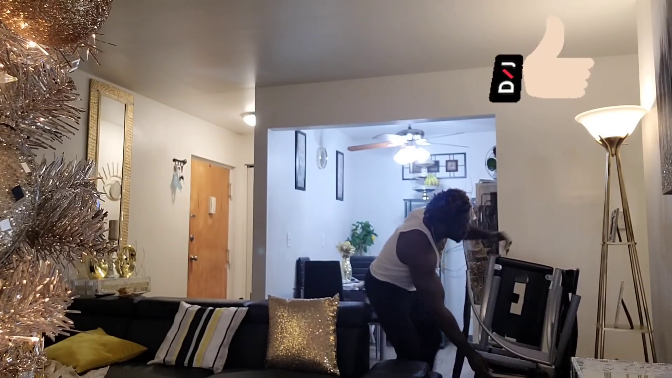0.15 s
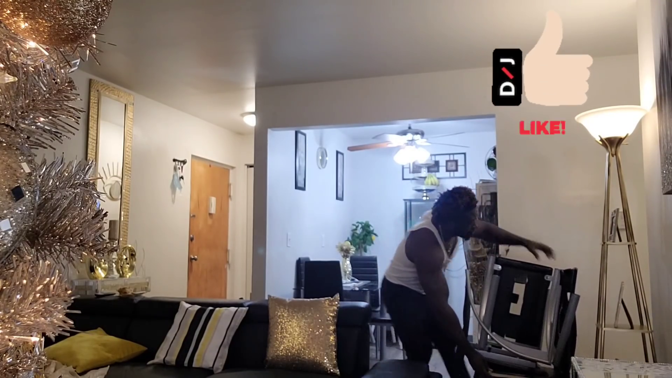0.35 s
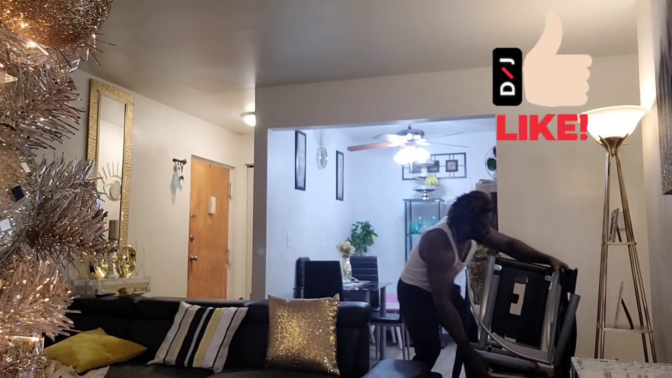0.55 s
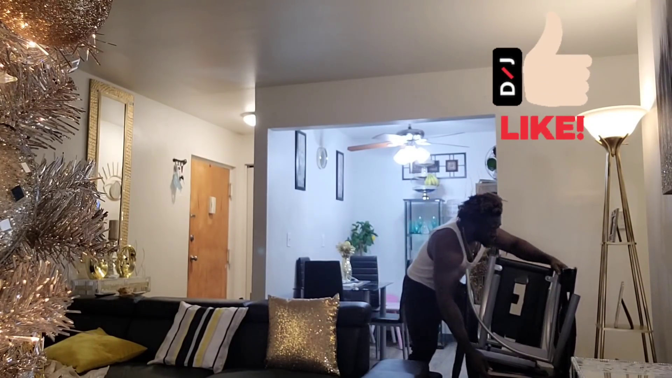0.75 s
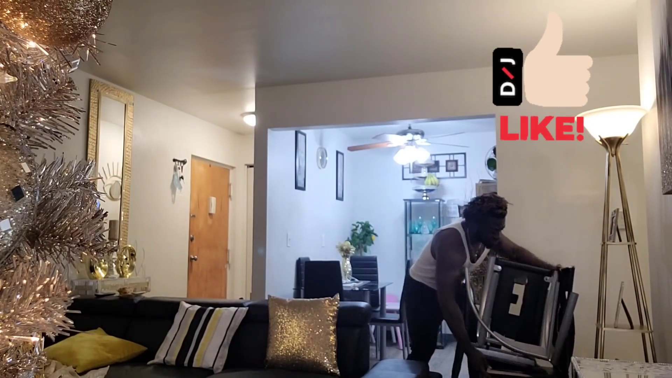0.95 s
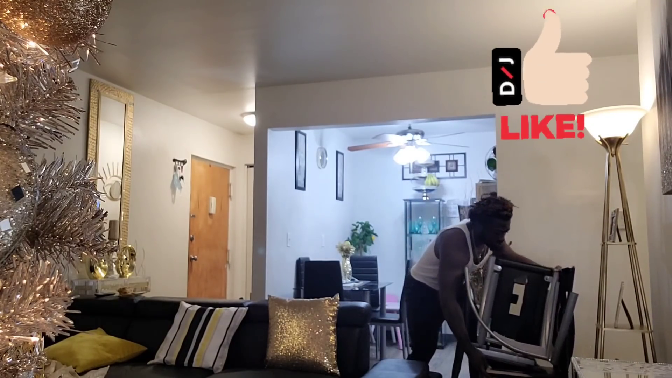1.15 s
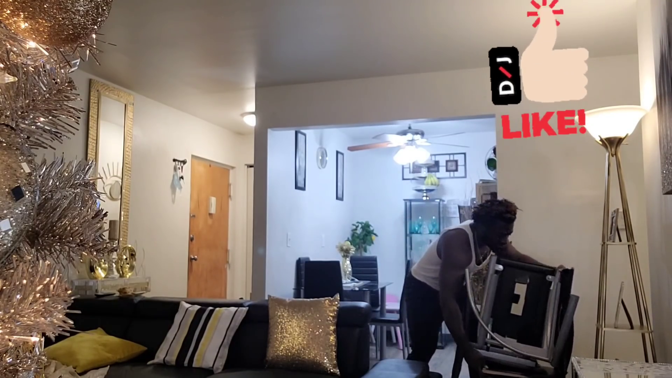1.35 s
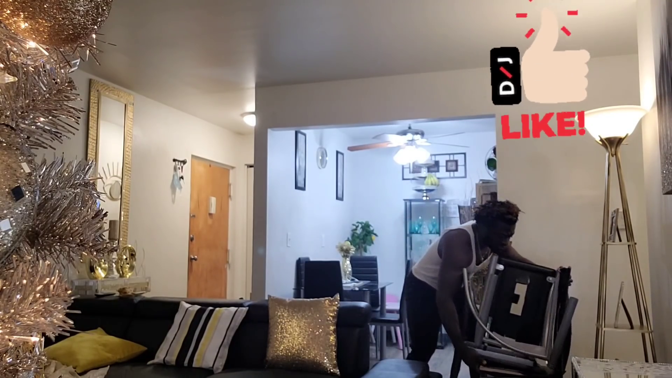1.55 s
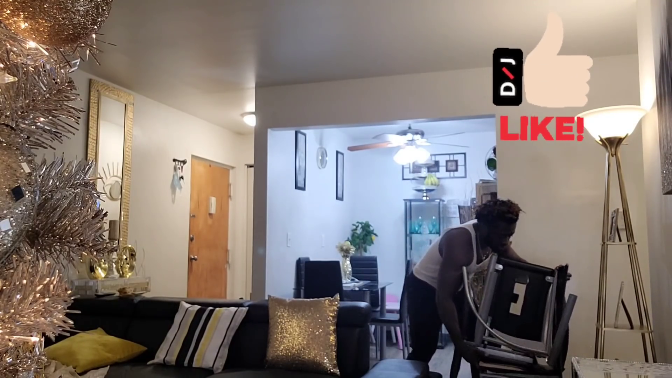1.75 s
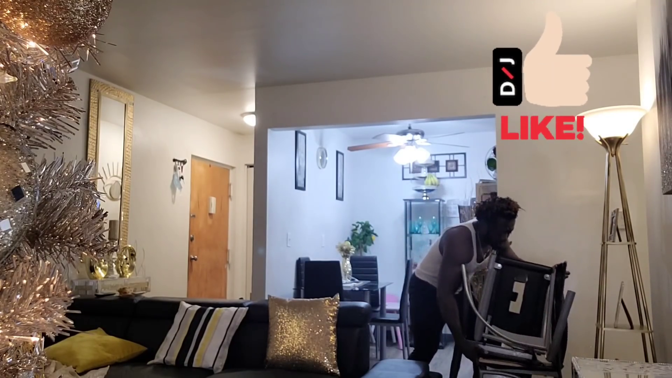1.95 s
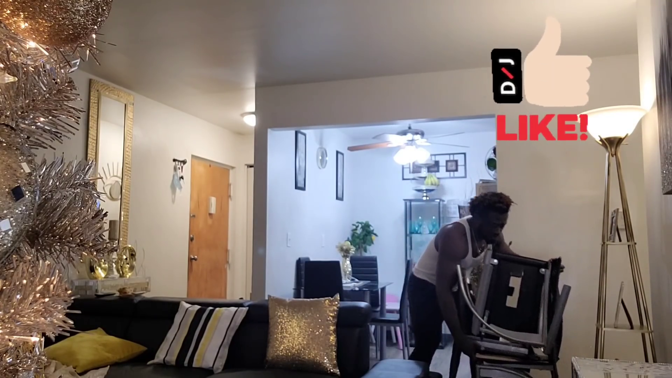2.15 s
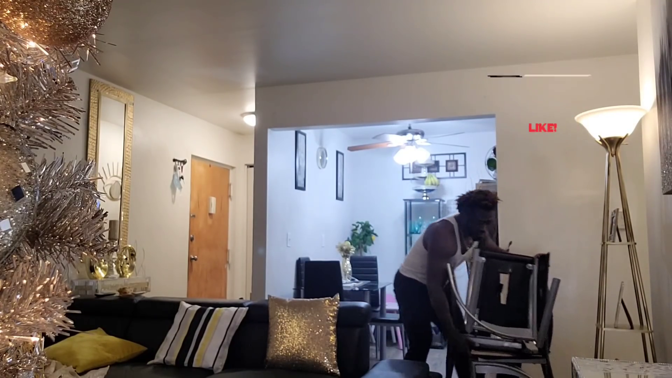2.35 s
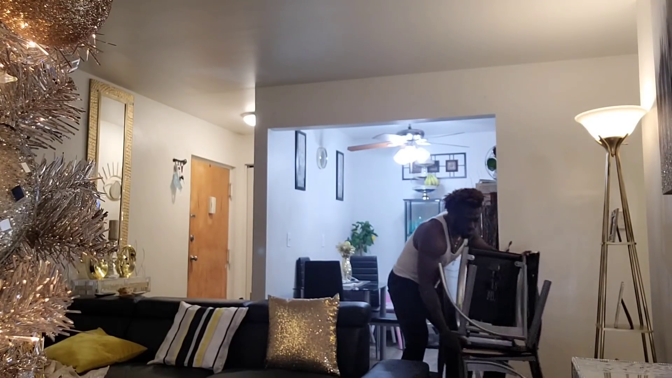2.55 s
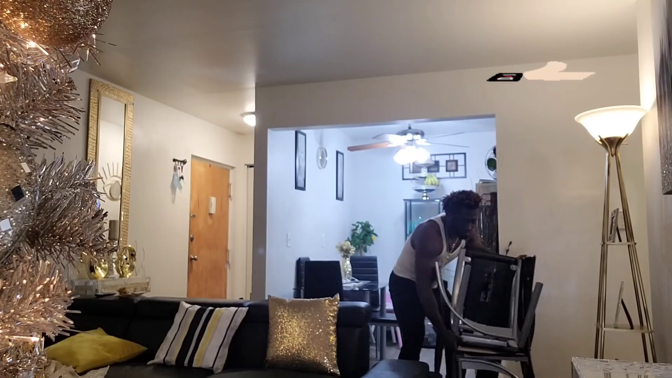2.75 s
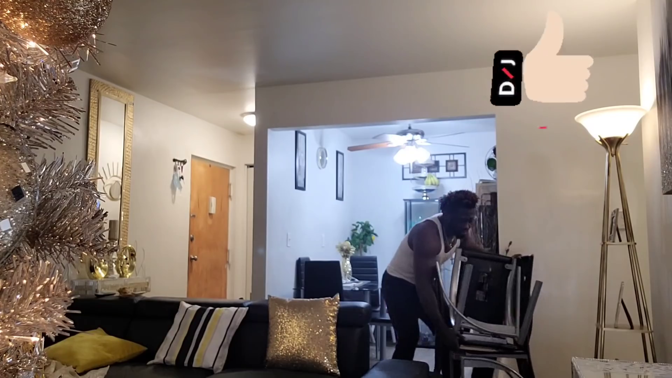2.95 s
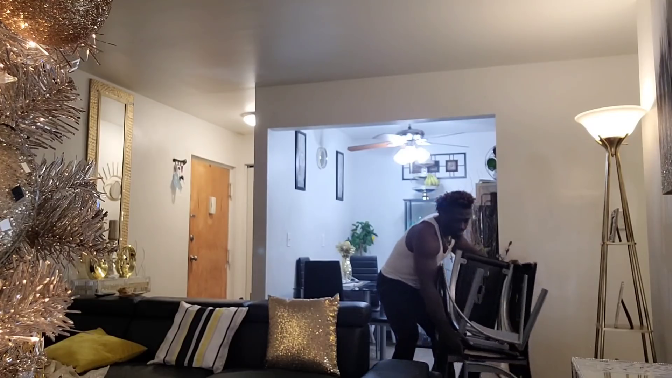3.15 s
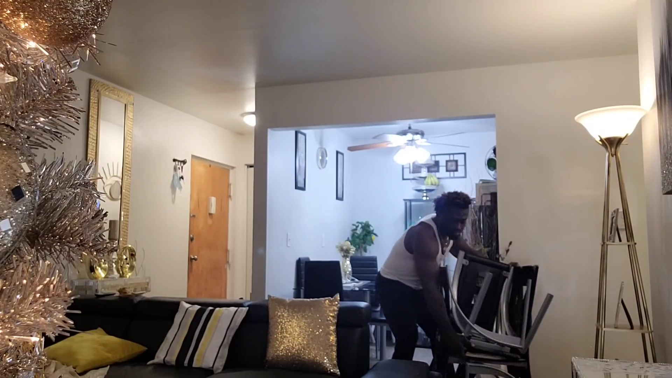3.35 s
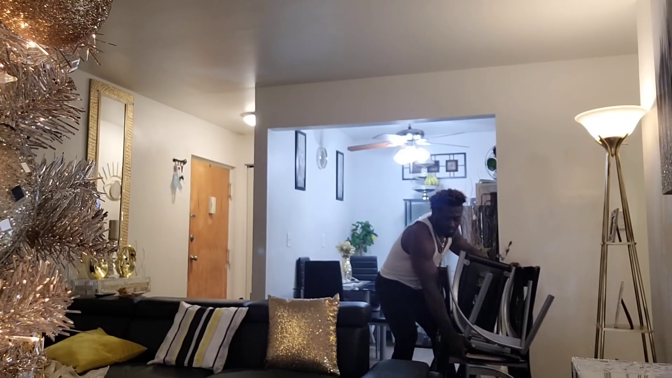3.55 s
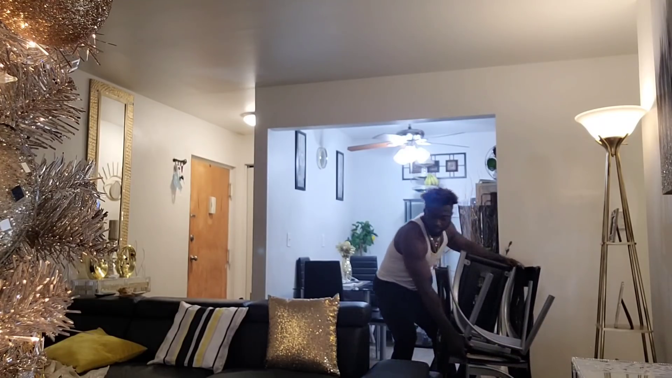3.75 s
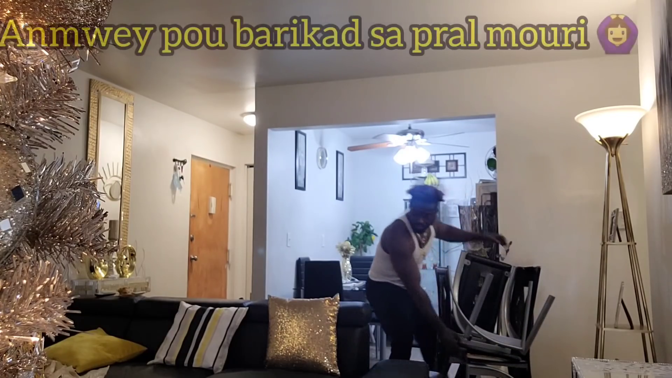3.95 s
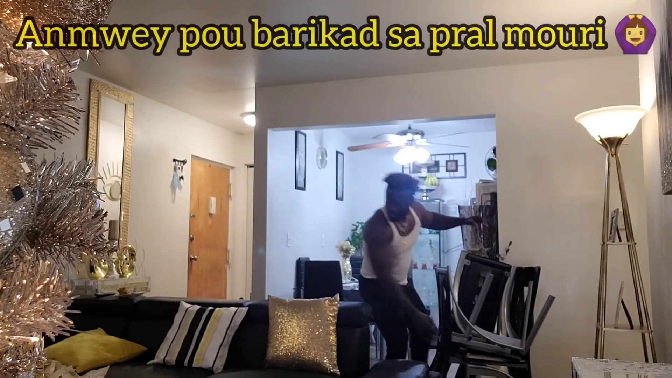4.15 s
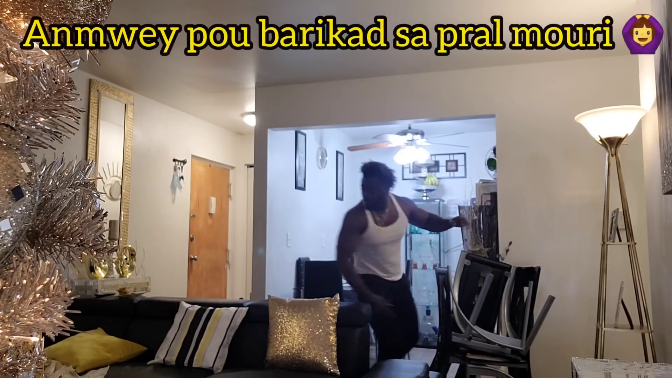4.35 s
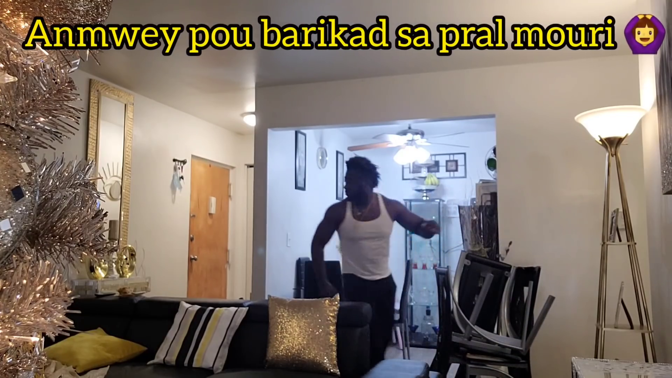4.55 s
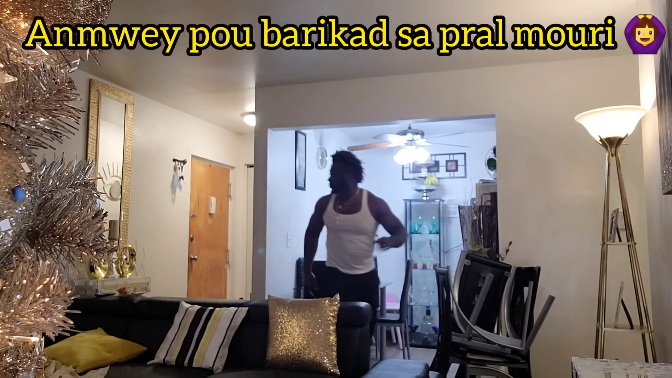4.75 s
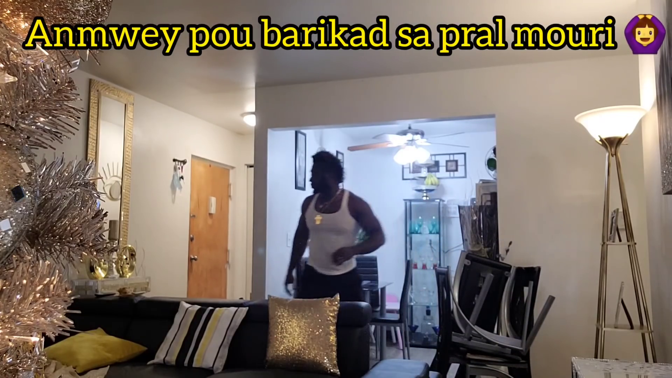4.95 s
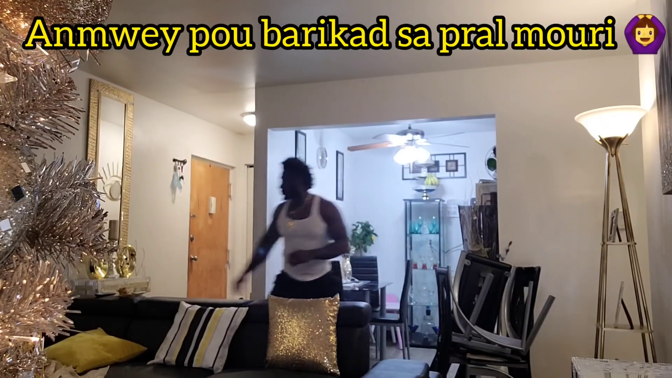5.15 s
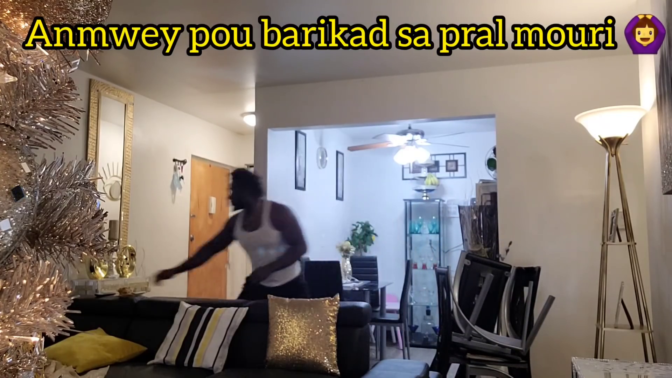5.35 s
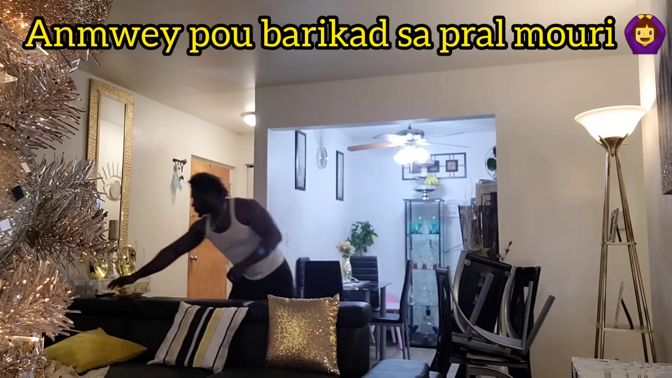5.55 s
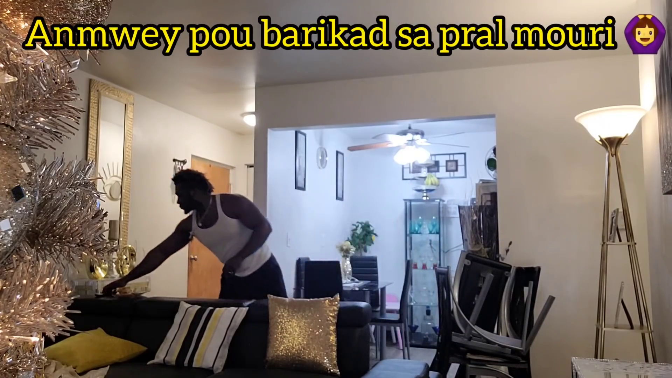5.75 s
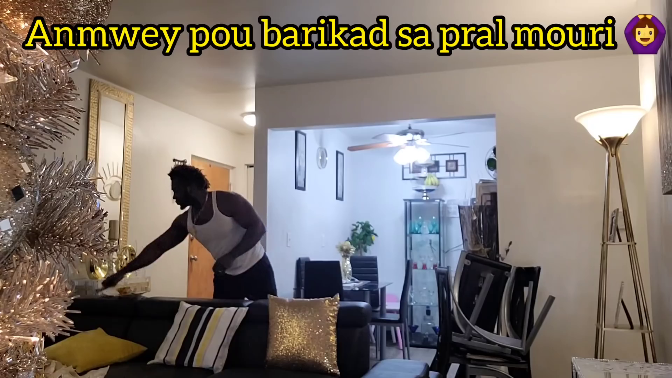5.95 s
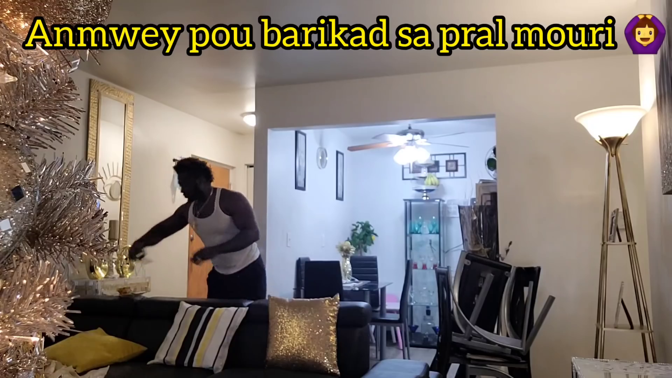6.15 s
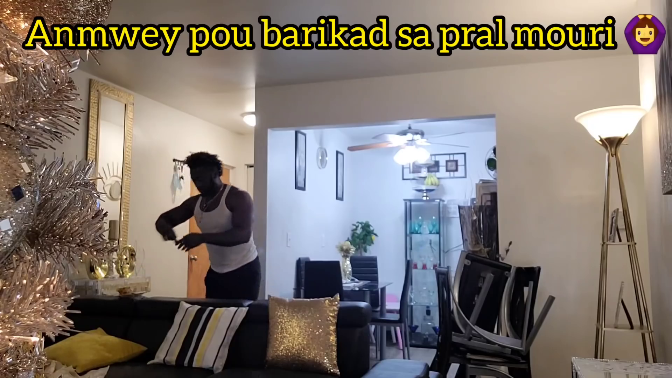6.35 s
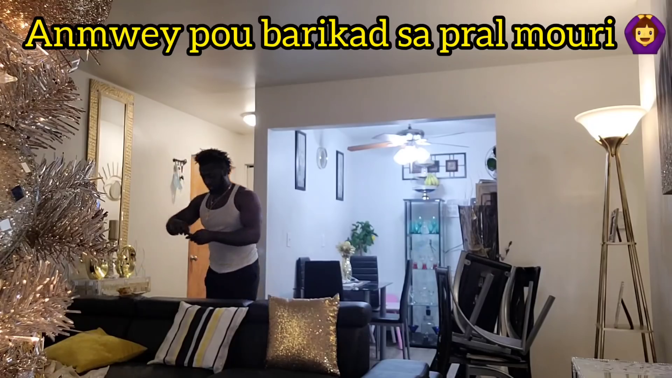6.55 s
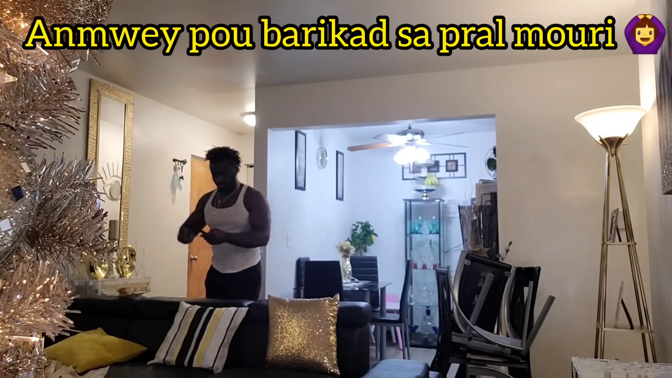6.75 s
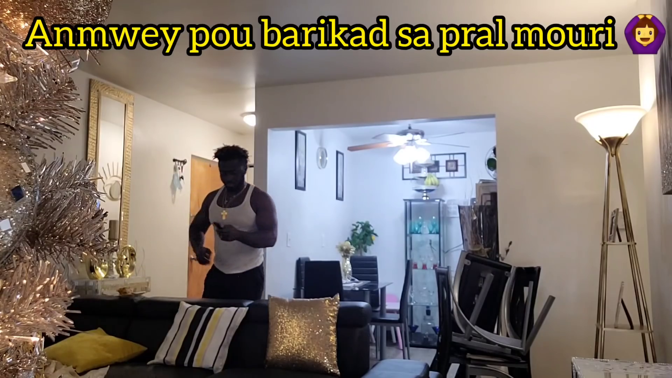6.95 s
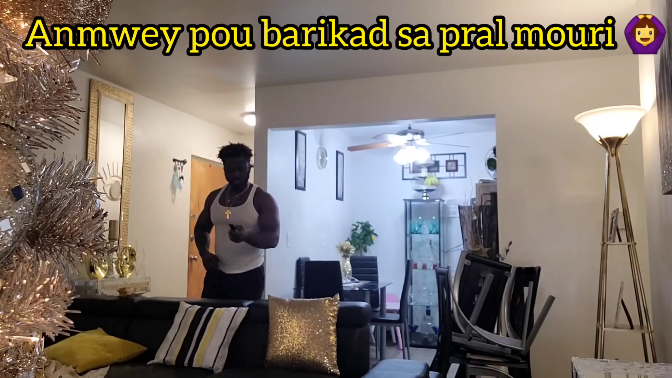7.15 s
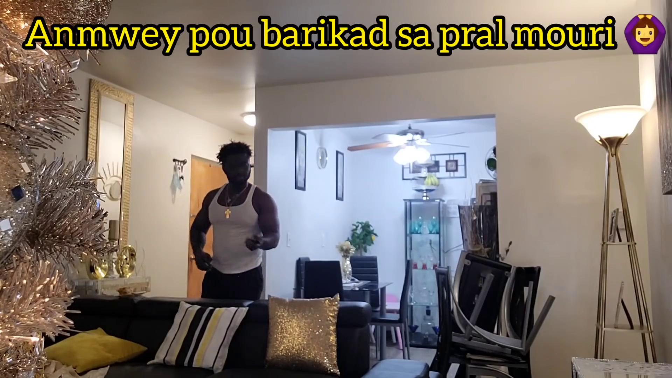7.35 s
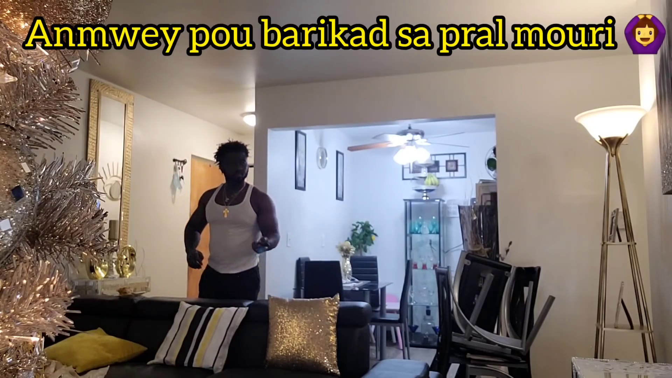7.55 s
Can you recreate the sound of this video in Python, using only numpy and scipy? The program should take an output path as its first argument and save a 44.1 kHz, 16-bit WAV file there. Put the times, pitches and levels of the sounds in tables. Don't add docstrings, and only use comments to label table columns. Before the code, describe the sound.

In a furnished living room, chairs are moved several metres from a stereo microphone. Small thuds, scuffs and thin metallic jingles come first, then loud clattering as the frames collide, then a softer knock and scrape as they settle. Slippered steps and light cloth rustle follow. A low appliance hum and faint once-a-second clock tick continue underneath.

```python
import sys
import numpy as np
from scipy import signal
from scipy.fft import rfft, irfft
from scipy.io import wavfile
from scipy.ndimage import uniform_filter1d

SR = 44100
rng = np.random.default_rng(int(sys.argv[2]) if len(sys.argv) > 2 else 0)


def log_audio(samples):
    frames = np.atleast_2d(samples).T
    limited = np.clip(frames, -1, 1)
    pcm = np.round(limited * 32767).astype(np.int16)
    wavfile.write(sys.argv[1], SR, pcm)


def invert_db(level):
    return 10 ** (np.asarray(level, dtype=float) / 20)


N = 335547


def rms_one(x):
    return x / np.sqrt(np.mean(x ** 2) + 1e-20)


def at_hz(points, hz):
    table_hz, values = np.transpose(points)
    return np.interp(np.log(hz), np.log(table_hz), values)


def drift(rate_hz):
    r = np.exp(-80 * np.pi * rate_hz / SR)
    noise = rng.standard_normal(N // 40 + 2002)
    slow = rms_one(signal.lfilter([1], [1, -2 * r, r * r], noise)[2000:])
    return np.interp(np.arange(N) / 40, np.arange(len(slow)), slow)


def ring(clicks, hz, t60_s):
    r, w = invert_db(-60 / (t60_s * SR)), 2 * np.pi * hz / SR
    return signal.lfilter([0, np.sin(w)], [1, -2 * r * np.cos(w), r * r], clicks + 1e-18)


def rattle(starts_s, length_s, count):
    place = rng.random((len(starts_s), count)) - 0.15
    place[:, 0] = 0
    times = np.asarray(starts_s)[:, None] + length_s * 2 * place
    weaker_db = np.where(place >= 0, -14 * place, 50 * place - 4)
    return times.ravel(), weaker_db.ravel()[:, None]


def strike(times, levels_db, modes, uneven_db, size=N):
    at = np.clip((np.asarray(times) * SR).astype(int), 0, size - 1)
    luck = rng.standard_normal((len(at), len(modes), 2))
    sizes = invert_db(levels_db + uneven_db * luck[..., 0]) * np.sign(luck[..., 1])
    out = np.zeros(size)
    for k, (hz, db, t60_s) in enumerate(modes):
        out += ring(np.bincount(at, sizes[:, k], size) * invert_db(db), hz, t60_s)
    return out


# (frequency [Hz], left-right correlation)
LIKENESS = [(60, 0.93), (130, 0.95), (190, 0.93), (270, 0.73), (500, 0.51), (1000, 0.044), (16000, 0.093)]
# (frequency [Hz], left minus right [dB])
LEAN = [(60, -5.5), (180, 3), (550, -7.5), (1650, -3), (4970, -3), (15000, -0.5)]


def bands(size):
    edges_hz = 25 * 2 ** np.arange(0, 9.6, 1 / 3)
    opposite = np.array([[1], [-1]])
    white = rng.standard_normal((2, 2, size))
    for k, (low, high) in enumerate(zip(edges_hz, edges_hz[1:])):
        band_pass = signal.butter(2, [low, high], "band", fs=SR, output="sos")
        mid, side = signal.sosfilt(band_pass, white[k % 2])
        hz = np.sqrt(low * high)
        alike = np.clip(at_hz(LIKENESS, hz), -1, 1)
        both = np.sqrt(1 + alike) * mid + np.sqrt(1 - alike) * side * opposite
        yield hz, both * invert_db(at_hz(LEAN, hz) / 2 * opposite)


# (frequency [Hz], t60 [s])
ROOM_T60 = [(100, 0.38), (300, 0.21), (1000, 0.35), (4000, 0.32), (12000, 0.26)]


def room(x, wet_db):
    evenness = 0.85
    t = np.arange(SR // 2) / SR
    early = (1 + invert_db(11.5 - 60 * t / 0.023)) * (1 - np.exp(-t / 0.0019))
    echoes = 0
    for hz, band in bands(len(t)):
        fade = early * invert_db(-60 * t / at_hz(ROOM_T60, hz))
        band_power = np.mean((band.mean(axis=0) * fade) ** 2)
        echoes = echoes + band * fade * np.sqrt(hz * np.mean(fade ** 2) / band_power)
    spectrum = rfft(echoes, 2 * len(t))
    power = np.abs(spectrum.mean(axis=0)) ** 2 + 1e-12
    ripple = uniform_filter1d(power, size=7) / uniform_filter1d(power, size=300)
    echoes = irfft(spectrum * ripple ** (-evenness / 2))[:, :len(t)]
    echoes = echoes * invert_db(wet_db) / np.sqrt(np.mean(np.sum(echoes ** 2, axis=1)))
    return x + signal.oaconvolve(echoes, x[None], axes=1)[:, :N]


# (frequency [Hz], density [dB per Hz])
HOUSE = [(15, -56), (25, -34.5), (59, -14), (92, -39.5), (105, -18), (195, -12), (223, -15.5), (317, -6),
         (344, -5.5), (373, -12), (840, -27), (962, -32), (1370, -52.5), (1560, -65), (16000, -102.5)]


def house_murmur():
    murmur = 0
    for hz, band in bands(N):
        murmur = murmur + band * invert_db(at_hz(HOUSE, hz) + 2.8 * drift(2.3))
    return invert_db(-58) * rms_one(murmur)


# (frequency [Hz], width [Hz], level [dB])
HUM = [(60, 39, -70), (137, 72, -71), (297, 44, -70), (1336, 150, -78.5)]


def appliance_hum():
    motor_hz, motor_db = 198.4 + 3.6 * drift(7.6), -58.5 + 1.7 * drift(2.4)
    out = invert_db(motor_db) * np.sin(2 * np.pi * np.cumsum(motor_hz) / SR)
    for hz, width_hz, db in HUM:
        t60_s = 4.0 / width_hz
        once = ring(rng.standard_normal(N), hz, t60_s)
        out = out + invert_db(db) * rms_one(ring(once, hz, t60_s))
    return out * invert_db([[-1.2], [1.2]])


# (time [s], rustle level [dB])
BUSTLE = [(0, -74.5), (.45, -94.5), (1.1, -76.5), (1.6, -75), (1.85, -83), (2.1, -68), (2.9, -60),
          (3.08, -69), (3.55, -86.5), (3.8, -96.5), (5.2, -92.5), (6.2, -102.5), (7.61, -100)]
# (level over the busy rustle [dB], share of its swing)
RUSTLE = [(11, 0.4), (-1, 0.83), (4.5, .7)]
# (peak time [s], length [s], level [dB], brightness [dB],
# hiss lead [share of length])
SCUFFS = [(0.224, 0.57, -73.5, 3.5, -0.073), (0.68, 0.31, -82, 13.5, .1), (1.353, 0.28, -66.5, 3, -0.12),
          (2.046, 0.078, -90, 0.5, -.1), (2.935, 0.093, -61.5, 2.5, -0.14), (3.303, 0.2, -59, -3.5, 0.04),
          (3.511, 0.27, -76.5, -5, -0.19), (3.963, 0.11, -93, 7.5, 0.12), (4.13, 0.24, -67, 2.5, .05),
          (4.381, 0.093, -86, -23.5, -0.0017), (4.526, 0.15, -87, 9, -0.038),
          (4.772, 0.28, -68, -1.5, 0.19), (5.48, 0.33, -66, 2.5, 0.023), (5.647, 0.15, -70.5, -12, 0.58),
          (5.817, 0.267, -89.5, 12, -0.098), (6.18, 0.052, -88, 23, -0.0055), (6.284, 0.29, -97, 23, 0.029),
          (6.544, 0.56, -92.5, 14, 0.022), (7.066, 0.19, -86.5, 7.5, 0.069), (7.345, 0.16, -84, -3, 0.079),
          (7.496, 0.085, -95.5, 16, -0.029)]


def sliding_levels(t):
    busy_db = -78
    rise_db, fall_db = 20, 14.5
    swing_db = np.interp(t, *np.transpose(BUSTLE)) - busy_db
    s, length, db, bright_db, lead = np.transpose(SCUFFS)[..., None]
    peaks_db = [db + 6, db, db + bright_db]
    levels = []
    for k, (over_db, share) in enumerate(RUSTLE):
        place = 2 * (t - s) / length + lead * k
        loss_db = np.where(place < 0, rise_db, fall_db) * np.abs(place) ** 1.87
        scuff_power = np.sum(invert_db(2 * (peaks_db[k] - loss_db)), axis=0)
        rustle_power = invert_db(2 * (busy_db + over_db + share * swing_db))
        levels.append(10 * np.log10(scuff_power + rustle_power))
    return np.array(levels)


# (frequency [Hz], level [dB])
SLIDE_COLOUR = [(400, -4), (1200, -2), (2000, -4), (2900, -2.5), (4000, 1.5), (9000, 3.5), (16000, -9.5)]


def sliding():
    coarse_t, t = np.arange(0, N / SR, 0.004), np.arange(N) / SR
    levels = sliding_levels(coarse_t) - 10 * np.log10([[1300], [3500], [6500]])
    grain_db = 0.62 * (drift(12) + 2.3 * drift(40))
    out = 0
    for hz, band in bands(N):
        if hz <= 300:
            continue
        position = np.interp(np.log(hz), np.log([1200, 4000, 11000]), [0, 1, 2])
        db = sum(max(0, 1 - abs(position - k)) * level for k, level in enumerate(levels))
        out = out + band * invert_db(np.interp(t, coarse_t, db) + at_hz(SLIDE_COLOUR, hz) + grain_db)
    return out * np.sqrt(SR / 2) * invert_db(3.5)


# (frequency [Hz], level [dB])
ZONES = [(280, 2.5), (1100, -19.5), (3600, -27), (9000, -35.5)]
# (frequency [Hz], level [dB], t60 [s])
CHAIR = [(219, -33, 0.79), (280, 8.5, 0.82), (413, -2.5, 0.9), (520, -15, 0.15), (555, -15, 0.3),
         (660, -22, 0.2), (774, -16, 0.5), (1180, -26, 0.59), (1265, -27, 0.33), (1760, -27, 0.17),
         (2000, -33.5, 0.099), (2650, -37.5, 0.13), (3620, -41.5, 0.17), (4300, -40.5, 0.12)]
# (frequency [Hz], level [dB])
CRACK = [(170, -19.5), (280, -7), (430, -23), (760, -4), (1200, -15), (2200, -12.5), (4400, -8),
         (15000, 2.5)]


def contacts(table, ring_share, ring_db, count=14):
    thud_hz, thud_fall_db_per_oct = 272.2, 8.5
    softer_db_per_oct, harder_db_per_oct = 3, 22.5
    rows = np.array(table)
    times, weaker_db = rattle(rows[:, 0], 0.009, count)
    modes = [(hz, db + ring_db - at_hz(ZONES, hz), ring_share * min(t60_s, 0.5)) for hz, db, t60_s in CHAIR]
    modes += [(hz, at_hz(CRACK, hz), 3.8 / hz) for hz in np.geomspace(170, 15500, 28)]
    octave = np.log2([hz / 1000 for hz, _, _ in modes])
    over_thud = np.maximum(octave - np.log2(thud_hz / 1000), 0)
    thud_db = rows[:, 1:2] - thud_fall_db_per_oct * over_thud
    off = octave - rows[:, 3:]
    frame_db = rows[:, 2:3] - np.where(off > 0, harder_db_per_oct * off, -softer_db_per_oct * off)
    colour_db = np.repeat(np.maximum(thud_db, frame_db), count, axis=0)
    blows = strike(times, colour_db + weaker_db, modes, uneven_db=2.0)
    return signal.sosfilt(signal.butter(4, 150, "high", fs=SR, output="sos"), blows)


def lone_rings(table):
    out, lead = np.zeros(N + SR), SR // 50
    for s, hz, db, t60_s, length_s in table:
        times, weaker_db = rattle([lead / SR], length_s, count=8)
        cluster = [(hz * 0.9, -3, t60_s / 4), (hz, 0, t60_s), (hz * 1.12, -2, t60_s / 4)]
        sound = strike(times, weaker_db, cluster, uneven_db=2, size=SR // 3)
        sound = signal.sosfilt(signal.butter(4, hz * 0.6, "high", fs=SR, output="sos"), sound)
        out[int(s * SR):][:len(sound)] += invert_db(db) * sound / np.abs(sound).max()
    return out[lead:N + lead]


# (time [s], seat thud peak [dB], frame peak [dB], hardness [octaves over 1 kHz])
SHIFTS = [(0.002, -37, -37, 1.67), (0.215, -40.5, -37, -1.13), (0.235, -54, -49, -3.5),
          (0.466, -64, -38, -2), (0.599, -49, -53, 0), (0.692, -39, -38, 6), (0.697, -37.5, -35, -0.64),
          (0.795, -40.5, -47, 0.5), (0.874, -62, -55.5, 2.7), (0.934, -71, -52.5, 1),
          (1.093, -53, -30.5, 1.28), (1.096, -70, -43, 3), (1.213, -35.5, -65, -0.1), (1.436, -34, -37, 1),
          (1.565, -61, -45, 1.5), (1.639, -42, -51.5, 1.5), (1.7, -38.5, -47, 3), (1.719, -34.5, -56, 0),
          (1.818, -65, -47.5, 3), (3.077, -43.5, -37.5, 3.5), (3.108, -28, -32, 1.46),
          (3.216, -33.5, -47, 3), (3.249, -43, -40.5, -7), (3.28, -41, -39.5, 0), (3.302, -32.5, -40, 0.5),
          (3.338, -30.5, -26, 2.5), (3.358, -36, -48, 7), (3.419, -69, -60, -9), (3.498, -45, -56.5, -3)]
# (time [s], seat thud peak [dB], frame peak [dB], hardness [octaves over 1 kHz])
CLASHES = [(2.143, -19.5, -29, 3.5), (2.154, -22, -22, 0.24), (2.162, -45, -20.5, 2.5),
           (2.168, -19.5, -21, -1), (2.185, -54, -21.5, 3), (2.198, -25.5, -25.5, 0.2),
           (2.216, -29.5, -28.5, 3), (2.405, -50, -31.5, 1.1), (2.476, -41, -21.5, 2.5),
           (2.484, -12.5, -9.5, 2), (2.491, -22.5, -17, 0.7), (2.647, -50, -28.5, 1.9),
           (2.658, -32.5, -24, 2.5), (2.675, -32, -15.5, 2.5), (2.704, -23, -23, -0.5),
           (2.726, -21, -16, 2.11), (2.827, -62, -39.5, -2.1), (2.931, -31, -25.5, 1.8),
           (2.941, -45, -30.5, 0.95)]
# (time [s],
# frequency [Hz], peak [dB], t60 [s], rattle length [s])
RINGS = [(0.599, 260, -41, 0.28, 0.0036), (0.878, 3900, -51, 0.015, 0.018),
         (0.939, 3700, -41.5, 0.011, 0.016), (0.234, 2000, -53.5, 0.017, 0.031),
         (0.24, 1030, -42.5, 0.017, 0.031), (0.467, 520, -48.5, 0.036, 0.017), (0.47, 1100, -62, .015, .02),
         (2.165, 167, -31, 0.13, 0.015), (0.949, 1830, -47, 0.018, 0.019), (1.095, 70, -58, 0.11, 0.012),
         (1.27, 1960, -53.5, 0.12, 0.13), (1.436, 65, -52, .12, 0.0084), (1.437, 266, -30, 0.094, .012),
         (1.721, 270, -31, 0.12, 0.014), (2.149, 1950, -34, 0.035, 0.0098),
         (2.932, 149, -45, 0.051, 0.0087), (3.338, 2600, -49, .01, .02), (3.34, 3840, -35, 0.012, 0.018),
         (6.168, 6270, -57.5, 0.017, .006), (2.165, 205.5, -22.5, 0.13, 0.0082),
         (2.167, 42.4, -42, 0.16, 0.03), (2.185, 7700, -35, 0.011, 0.028), (2.188, 413, -23, 0.033, 0.013),
         (2.484, 235.5, -14.5, 0.073, 0.0026), (2.484, 3880, -15.5, 0.005, 0.013),
         (2.661, 7860, -23.5, .008, 0.011), (2.676, 4375, -15.5, 0.008, 0.011),
         (2.69, 60, -38, 0.064, 0.012), (2.725, 311, -15, 0.05, 0.0031), (2.927, 322, -33, 0.077, 0.003),
         (3.307, 220, -36.5, 0.07, 0.0086), (3.315, 81.6, -36.5, 0.1, 0.0081),
         (3.353, 3430, -50, 0.08, 0.038), (4.366, 2180, -49, 0.0031, 0.022),
         (4.4, 1175, -61.5, 0.057, 0.0062), (5.809, 1092, -53, 0.012, 0.008),
         (6.242, 1240, -51, 0.022, 0.004), (7.481, 2650, -60, 0.0071, 0.018),
         (0.001, 334, -40, 0.044, 0.0063), (0.215, 786, -40, 0.026, 0.022),
          (0.217, 565, -59, 0.036, 0.0094), (0.222, 1660, -54, 0.022, 0.04),
          (0.463, 781, -46.5, 0.13, 0.016), (0.688, 600, -47, 0.026, .012), (0.797, 650, -50.5, .015, .003),
          (1.094, 783, -40.5, 0.085, 0.013), (1.095, 1140, -39, 0.026, .015),
          (1.095, 2650, -46.5, .006, 0.0008), (1.098, 1780, -42, 0.013, 0.0058),
          (1.435, 580, -38, .02, .012), (1.728, 595, -59, .04, 0.0033), (2.166, 787, -32.5, 0.11, 0.038),
          (2.486, 514, -25.5, 0.14, .01), (2.488, 760, -34.5, 0.087, 0.011),
          (2.501, 1310, -26.5, .04, 0.011), (2.5, 2020, -31, 0.025, 0.017), (2.646, 898, -43, .015, 0.0053),
          (2.678, 656, -28, 0.049, 0.024), (2.726, 423, -24, 0.2, 0.0084), (2.727, 660, -25.5, 0.051, .006),
          (2.931, 765, -28.5, 0.029, 0.0074), (2.932, 423, -36, 0.027, 0.0048),
          (2.939, 1180, -32, 0.016, 0.0043), (3.082, 2640, -43.5, .012, 0.0022),
          (3.103, 1170, -44.5, 0.02, .008), (3.178, 950, -41.5, .015, 0.0026),
          (3.293, 1930, -45.5, .03, 0.01), (4.352, 1070, -50.5, 0.013, .004),
          (4.82, 1170, -50, 0.011, 0.0063), (4.833, 1110, -46, .03, 0.0077),
          (4.838, 1760, -46, 0.016, 0.0048), (4.837, 2600, -53.5, .02, .004),
          (6.33, 2600, -68, 0.016, 0.0074), (6.342, 1200, -54, .015, 0.0029), (6.47, 1200, -62, .03, 0.019),
          (6.49, 1895, -61.5, 0.021, .02)]


def folding_chairs():
    blows = contacts(SHIFTS + CLASHES, ring_share=0.13, ring_db=-22.5)
    parts = lone_rings(RINGS)
    return (room(blows, wet_db=7.0) + room(parts, wet_db=-1.5)) * invert_db([[-0.6], [0.6]])


# (time [s], level [dB])
TICK = [
    (.007, -3.5),
    (0.018, 6.5),
    (.028, 4.5),
    (0.033, 5),
]
# (frequency [Hz], level [dB], t60 [s])
CLOCK = [(1388, -3.5, 0.009), (2600, -11, 0.016), (3300, -7.5, 0.0052), (4200, -1, 0.0058),
         (4470, 1.5, 0.004), (5340, -5.5, 0.0086), (6460, 0, 0.0078), (7270, -1.5, 0.0036),
         (10740, -15.5, 0.0016), (13690, -13.5, 0.0015)]


def clock():
    lag, db = np.transpose(TICK)
    starts = (np.arange(8)[:, None] + lag).ravel()
    times, weaker_db = rattle(starts, 0.007, count=6)
    levels_db = np.repeat(np.tile(db, 8), 6)[:, None] + weaker_db - 58
    return strike(times, levels_db, CLOCK, uneven_db=1.5)


# (time [s], peak [dB])
JINGLES = [(0.5606, -41), (0.5994, -38), (0.6484, -35), (0.6894, -46), (0.7664, -36), (1.0794, -32),
           (2.832, -40), (3.079, -42), (3.113, -44), (3.4, -77.5), (6.1644, -39.5), (6.2644, -46),
           (6.3094, -40), (6.4832, -55)]
# (frequency [Hz], level [dB], t60 [s])
CHAIN = [(6640, -4, 0.045), (8100, -10, 0.022), (8880, -7, 0.029), (11230, -19, 0.022), (13010, -9.5, 0.03),
         (14250, -24, .02)]


def chain():
    s, db = np.transpose(JINGLES)
    times, weaker_db = rattle(s, 0.012, count=4)
    return strike(times, np.repeat(db, 4)[:, None] + weaker_db - 21.0, CHAIN, uneven_db=4.5)


# (time [s], frequency [Hz], peak [dB], t60 [s])
PINGS = [(3.348, 3300, -46, .24), (3.349, 3408, -45, .29), (0.5994, 13010, -62, .12),
         (0.56, 8100, -64, .06), (0.647, 6620, -53, .13), (0.692, 9000, -60, .04), (0.765, 13010, -62, .04),
         (0.768, 8250, -64, .08), (3.112, 13100, -55, .05), (3.112, 14800, -57, .05),
         (3.12, 11000, -59, .04), (3.03, 6700, -60, .06), (1.028, 4300, -48, .008),
         (1.029, 7000, -56, .005), (3.078, 2550, -45, .02), (3.078, 10500, -52, .004),
         (6.165, 13000, -66, .04)]


def pings():
    return sum(invert_db(db) * ring(np.arange(N) == int(s * SR), hz, t60_s) for s, hz, db, t60_s in PINGS)


# (time [s], frequency [Hz], peak [dB], t60 [s], rattle length
# [s])
FURTHER_RINGS = [(0.69, 10900, -55, .03, .005), (0.69, 14700, -54.5, .02, .006), (0.703, 400, -39, .03, .004),
                 (0.725, 560, -45, .03, .015), (1.102, 2766, -59, .15, 0.0084), (1.122, 990, -40, .02, .008),
                 (1.3, 1890, -60.5, .2, 0.067), (1.36, 2580, -56, .08, .04), (2.164, 4200, -30, .006, .006),
                 (2.195, 350.8, -27.5, .04, .01), (2.479, 5600, -26.5, .01, .014),
                 (2.48, 1498, -20.5, .008, 0.0086), (2.489, 3005, -29, .006, 0.0091),
                 (2.493, 4400, -22, .008, .01), (2.669, 3300, -29, .006, .006), (2.678, 6970, -29, .008, .012),
                 (2.687, 4700, -21, .008, .018), (2.69, 1288, -26, .012, .02), (2.7, 4090, -24.5, .01, .018),
                 (2.703, 5203, -29.5, .008, .018), (3.078, 7700, -40, .004, .004),
                 (3.243, 11880, -49, .003, 0.017), (3.337, 13380, -41, .003, .004),
                 (3.338, 10540, -43, .003, .003), (3.337, 5800, -43, .004, .004), (2.17, 330, -24, 0.035, 0.01),
                 (2.49, 279, -24, 0.13, .006), (3.398, 13180, -51, .01, .012), (3.408, 11010, -51.5, .025, .005),
                 (2.486, 160.1, -24, .1, 0.0052), (2.677, 4460, -21, .012, .008), (0.795, 1000, -53, .015, .006),
                 (0.218, 1390, -47, .02, .015), (0.72, 2000, -51, .02, .02), (2.486, 4200, -20.5, .006, .02),
                 (2.674, 4200, -23.5, .006, .01), (0.24, 1900, -53.5, .015, .03), (2.71, 3600, -28, .006, 0.023),
                 (3.255, 14060, -52, .002, .025), (0.936, 4300, -51, .006, .02)]


def further_rings():
    return lone_rings(FURTHER_RINGS)


# (time [s], thud peak [dB], click peak [dB], hardness [octaves over 1 kHz])
TAPS = [(3.813, -52, -61.5, 0.58), (4.358, -60, -51, 0.33), (4.625, -63, -55.5, 4),
        (4.836, -70, -54.5, 0.89), (5.359, -66, -42, 1.06), (5.412, -51, -46, 5.2), (5.8, -56, -53.5, 0.63),
        (6.16, -65, -67, 2.85), (6.238, -61, -67, 0.068), (6.325, -71, -53, 0.56), (6.478, -67, -57, 0.53),
        (7.478, -57, -67, 1.66)]


def footsteps():
    return contacts(TAPS, ring_share=0.037, ring_db=-52.0)


def scene():
    background = house_murmur() + appliance_hum() + sliding()
    ticks = room(clock(), wet_db=-11.0) * invert_db([[-3], [3]])
    rings_and_links = room(chain() + pings() + further_rings(), wet_db=-1.0)
    steps = room(footsteps(), wet_db=2.0)
    return background + folding_chairs() + ticks + rings_and_links + steps


def low_pass(x):
    return signal.sosfilt(signal.butter(12, 16590, fs=SR, output="sos"), x)


# (frequency [Hz], level [dB])
MIC = [(3000, 1), (4300, 3), (5200, -0.5), (7600, 1), (8100, 0.5), (8500, -6), (15000, 4.5)]


def record(dry):
    left_lag_s, top_hz = 0.00009, 15850
    hz = np.maximum(np.fft.rfftfreq(N, 1 / SR), 1)
    spacing = np.exp(-2j * np.pi * hz * [[left_lag_s], [0]])
    x = irfft(rfft(dry) * invert_db(at_hz(MIC, hz)) * (hz < top_hz) * spacing, N)
    mix = signal.sosfilt(signal.butter(2, 40, "high", fs=SR, output="sos"), x)
    return low_pass(mix)


dry = scene()
out = record(dry)
log_audio(out)
```